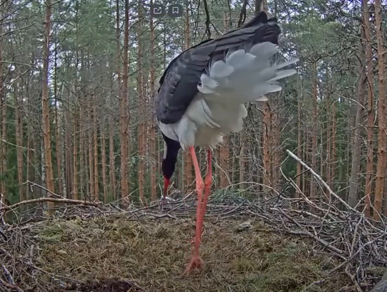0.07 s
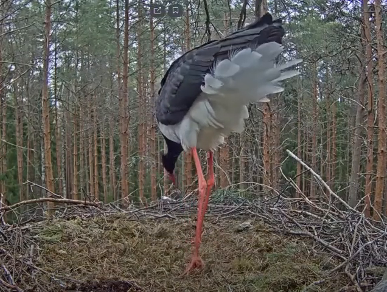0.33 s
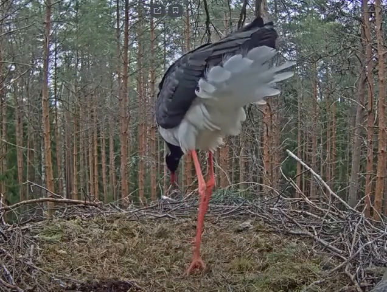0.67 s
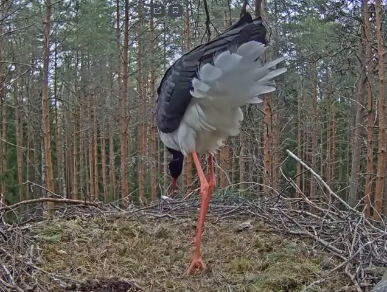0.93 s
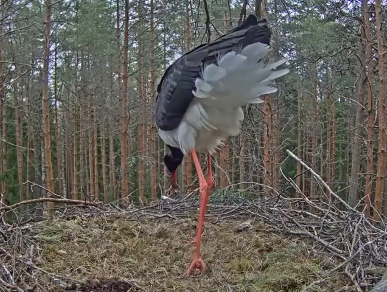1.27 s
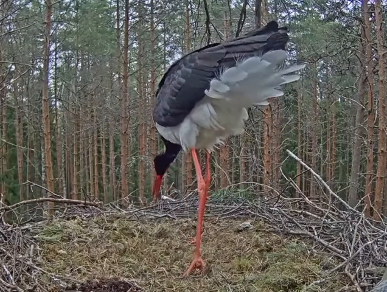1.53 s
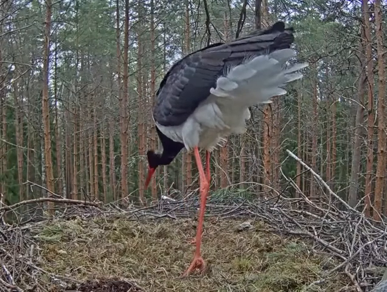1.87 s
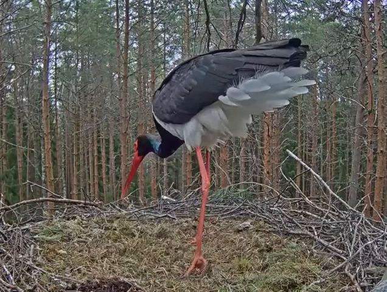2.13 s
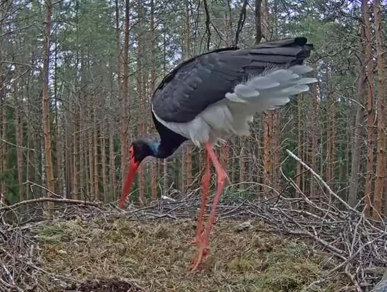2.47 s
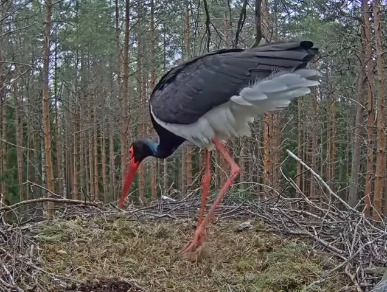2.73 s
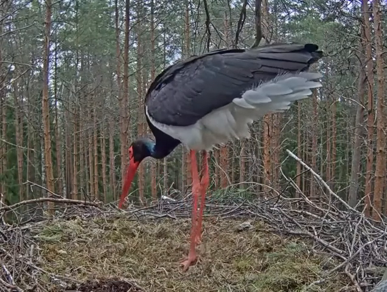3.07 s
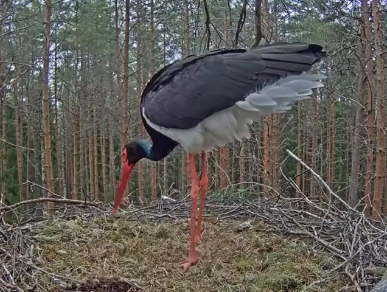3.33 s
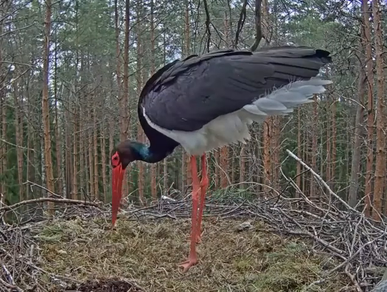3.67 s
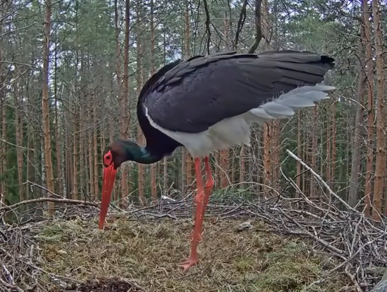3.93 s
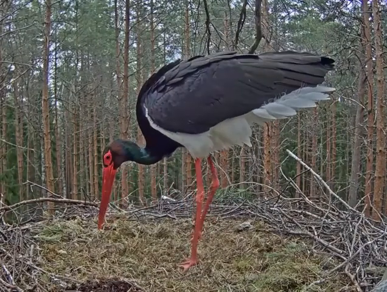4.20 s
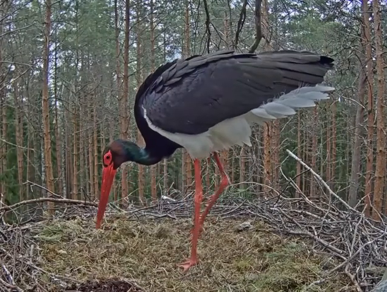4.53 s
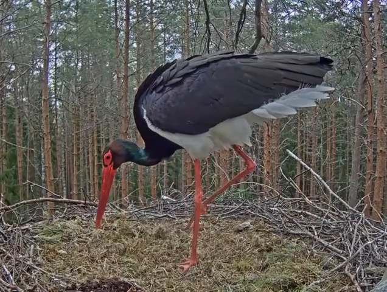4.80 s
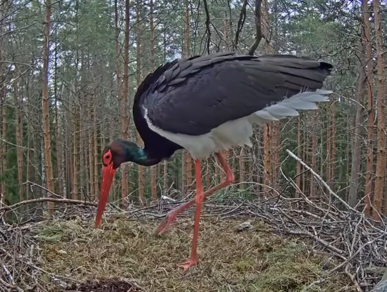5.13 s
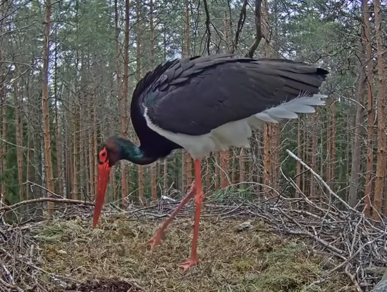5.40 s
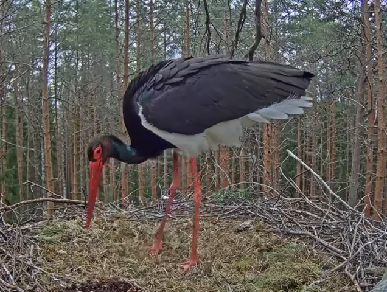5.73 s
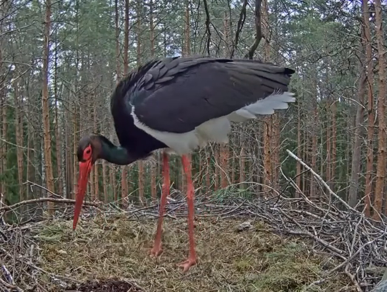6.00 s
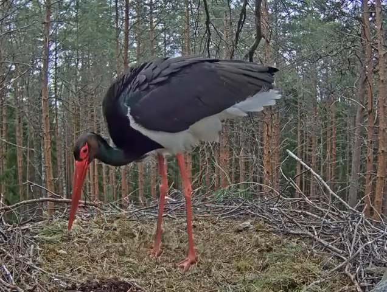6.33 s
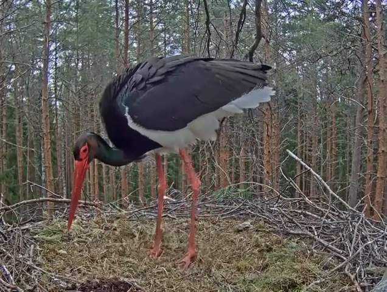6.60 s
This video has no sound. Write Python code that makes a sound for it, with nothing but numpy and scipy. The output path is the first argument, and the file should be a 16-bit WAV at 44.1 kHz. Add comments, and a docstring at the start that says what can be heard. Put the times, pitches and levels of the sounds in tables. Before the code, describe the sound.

A stork's brief squeal, two short hisses and soft peeps, with snapping twigs, then faint rustles in a breezy forest.

```python
"""A nest in a pine forest, where a black stork steps about over a steady rumble and a light breeze.
A bird on the nest squeals hoarsely, hisses twice and peeps softly in between: the syrinx is a
self-sustained oscillator, and turbulent air excites the resonances of the throat. Twigs snap and the
nest takes dull knocks, both as damped vibrations after an impulse; the lining rustles, feathers swish
and a bill smacks faintly. Near the end the breeze and a thin high hiss come up and stay up."""
import sys
import numpy as np
from scipy import signal
from scipy.fft import rfft, irfft, next_fast_len
from scipy.io import wavfile
from scipy.ndimage import uniform_filter1d, map_coordinates

SR = 44100
rng = np.random.default_rng(int(sys.argv[2]) if len(sys.argv) > 2 else 0)


def transcribe(signal):
    """Save signal, clipped to [-1, 1], as a 16-bit WAV file at the path in sys.argv[1]."""
    frames = np.atleast_2d(signal).T
    limited = np.clip(frames, -1, 1)
    pcm = np.round(limited * 32767).astype(np.int16)
    wavfile.write(sys.argv[1], SR, pcm)


N = 294147

RISE_S, RISE_LENGTH_S = 5.226, .18  # the breeze and the high hiss come up


def amp(db):
    """Decibels to amplitude ratio."""
    return 10 ** (np.asarray(db) / 20)


def unit(x):
    """Scale to rms 1."""
    return x / np.sqrt(np.mean(x ** 2) + 1e-20)


def along(points, hz):
    """Interpolate (Hz, value) points on a logarithmic frequency axis."""
    f, v = np.transpose(points)
    return np.interp(np.log(hz + 1), np.log(f + 1), v)


def clock():
    """The time of each sample in seconds."""
    return np.arange(N) / SR


def ramp(start, length):
    """A linear rise from 0 to 1."""
    return np.clip((clock() - start) / max(length, 1e-4), 0, 1)


def bump(centre, width):
    """A Gaussian swell of height 1; the width is its standard deviation."""
    return np.exp(-.5 * ((clock() - centre) / width) ** 2)


def gate(start, end, edge_s=.0012):
    """A window with sloping edges."""
    return np.clip(np.minimum(clock() - start, end - clock()) / edge_s + .5, 0, 1)


def wobble(rate):
    """A smooth random curve with rate knots a second."""
    return map_coordinates(rng.standard_normal(int(N * rate / SR) + 4), [np.arange(N) * rate / SR])


def filtered(x, response):
    """Zero-phase filtering: multiply the spectrum by a response of frequency."""
    size = next_fast_len(N + 8192)
    return irfft(rfft(x, size) * response(np.fft.rfftfreq(size, 1 / SR)), size)[..., :N]


def noise(response):
    """Filtered white noise of rms 1."""
    return unit(filtered(rng.standard_normal(N), response))


def spectrum_noise(points):
    """Noise of rms 1 whose spectrum follows (Hz, dB) points."""
    return noise(lambda hz: amp(along(points, hz)))


def resonances(modes, hz, cut_hz=860):
    """Gain of (Hz, half width in Hz, dB) peaks added in power; a small source radiates no bass."""
    power = sum(amp(db) ** 2 / (1 + .5 * ((hz - centre) / width) ** 2) ** 4
                for centre, width, db in modes)
    return np.sqrt(power / (1 + (cut_hz / (hz + 1)) ** 16))


def rumble(level_db=-42.5):
    """Distant rumble: nearly stationary noise with its power at low frequencies."""
    # Each row: frequency in Hz, relative spectral level in dB.
    spectrum = [(20, -15), (35, -9.5), (55, -6.5), (100, 0), (150, -0.5), (230, -6.5), (400, -8), (470, -6),
                (650, -12), (900, -16), (1500, -50)]
    return amp(level_db + .2 * wobble(4.75)) * spectrum_noise(spectrum)


def breeze(calm_db=-48.5, gust_db=3, rise_db=4.5, strong_db=-43):
    """Turbulence in the pines brightens with strength: needle noise grows faster than the low body."""
    # Each row of both: frequency in Hz, relative spectral level in dB.
    body_spectrum = [(200, -1.5), (500, -3), (1000, 0), (1380, -2), (1550, -9.5), (1800, -13.5),
                     (2000, -21), (3200, -27.5), (5000, -33)]
    needle_spectrum = [(900, -30), (1700, 3), (2600, 1), (4000, 2), (6000, -21), (12000, -42)]
    body_db = calm_db + gust_db * bump(1.63, .41) + rise_db * ramp(RISE_S, RISE_LENGTH_S)
    needle_db = -55 + 3.4 * np.minimum(body_db - strong_db, 0)
    body = amp(body_db + .53 * wobble(9)) * spectrum_noise(body_spectrum)
    return body + amp(needle_db) * spectrum_noise(needle_spectrum)


def high_hiss(calm_db=-53, rise_db=5.5):
    """The thin hiss of the forest: broadband noise with its power in the treble."""
    # Each row: frequency in Hz, relative spectral level in dB.
    spectrum = [(1500, -24), (2500, -11.5), (3900, -9.5), (4150, -2), (5500, 0.5), (8500, 1), (10000, -1),
                (13000, -5), (14300, -9.5), (15000, -47)]
    level_db = calm_db + rise_db * ramp(RISE_S, RISE_LENGTH_S) + .6 * wobble(4)
    return amp(level_db) * spectrum_noise(spectrum)


def trunk_echo(x, t60=.53, wet_db=-26):
    """Scattering from the nest rim and the trees adds a weak, exponentially decaying tail."""
    t = np.arange(SR // 2) / SR
    tail = rng.standard_normal(len(t)) * amp(-60 * t / t60)
    return x + amp(wet_db) * signal.fftconvolve(x, tail / np.linalg.norm(tail))[:N]


def feather_swishes():
    """Sliding friction of feathers gives smooth swells of bright noise as the stork steps."""
    # Each row: centre in seconds, level in dB, width in seconds.
    swishes = [(2.75, -58, .1), (3.72, -57, .12), (4.355, -49, .07), (6.4, -53, .13)]
    # Each row: frequency in Hz, relative spectral level in dB.
    spectrum = [(2500, -28), (3800, -14), (4700, -2), (9000, -1), (11000, -7), (15000, -25)]
    return sum(amp(db) * bump(s, width) for s, db, width in swishes) * spectrum_noise(spectrum)


def lining_rustle():
    """Dry moss and grass crackle at each shift of weight: noise under fast random modulation."""
    # Each row: centre in seconds, level in dB, width in seconds.
    shifts = [(0.502, -46, 0.069), (.9, -49, .06), (1.162, -44, 0.032), (1.314, -49.5, 0.036),
              (1.65, -53, 0.18)]
    bands = [(5650, 2300, 4.5), (8900, 2500, -1), (12500, 1700, -8)]
    clumps = amp(3 * wobble(70) + 4 * wobble(900))
    grains = clumps * noise(lambda hz: resonances(bands, hz))
    return sum(amp(db) * bump(s, width) for s, db, width in shifts) * unit(grains)


def cracks(events, damping, splinter):
    """An impulse and a dying spray of splinters drive a stick, a heavily damped oscillator."""
    out, t = np.zeros(N + SR), np.arange(SR // 16) / SR
    for start, db, hz, life in events:
        force = splinter * rng.standard_normal(len(t)) * amp(-40 * t / life)
        force[0] += 1
        stick = np.sqrt(t) * np.exp(-damping * hz * t) * np.sin(2 * np.pi * hz * t)
        crack = signal.fftconvolve(force, stick)[:len(t)]
        out[round(start * SR):][:len(t)] += amp(db) * crack / np.abs(crack).max()
    return out[:N]


def twig_snaps():
    """Brittle fracture rings the twigs briefly at high frequencies."""
    # Each row: start in seconds, peak in dB, frequency in Hz, 40 dB decay of the splinters in seconds.
    snaps = [(.0998, -19, 5670, 0.0051), (.11, -21, 7000, 0.0057), (.189, -21.5, 8400, 0.011),
             (.477, -25.5, 6500, .0056), (.6884, -24.5, 8300, .018), (.7955, -4.5, 4800, 0.0031),
             (.8044, -13.5, 5770, .0021), (.8685, -24.5, 7460, 0.051), (.953, -29, 7500, .021),
             (1.2015, -19.5, 11100, 0.0083), (1.2022, -11, 5250, 0.0093), (1.21, -20.5, 4960, .03),
             (1.292, -25.5, 8650, .018), (1.3175, -22.5, 8800, 0.015), (1.4465, -26.5, 5470, 0.0075),
             (5.276, -25.5, 5250, 0.0033)]
    return cracks(snaps, damping=1, splinter=.38)


def nest_knocks():
    """Impacts on the nest sound dull: low resonances, strong damping, little splintering."""
    # Each row: start in seconds, peak in dB, frequency in Hz, 40 dB decay of the splinters in seconds.
    knocks = [(.7956, -8, 1600, 0.0048), (.7975, -31, 1100, .012), (5.2754, -27, 600, .005),
              (5.2759, -23, 1260, .002), (5.278, -28, 1090, .008)]
    return cracks(knocks, damping=1.7, splinter=.091)


def bill_smacks(gap_s=.0394, fade_db_per_s=31, start_hz=1050, rise_hz=3000, fuzz=.33, gain_db=-8):
    """Wet smacks of a bill in fading bouts: upward chirps, broadened by phase noise."""
    # Each row: start in seconds, length in seconds, relative level of the first smack in dB.
    bouts = [(1.072, .02, -38), (1.908, .14, -35.5), (4.84, .3, -35.5), (5.744, .22, -27)]
    beats = [(s + lag, db - fade_db_per_s * lag)
             for s, span, db in bouts for lag in np.arange(0, span, gap_s)]
    flicks = [(s, db, 3) for s, db in beats]
    flicks += [(s + .01, db - 8.5, 6.5) for s, db in beats]  # a weaker, erratic flick follows each
    out = np.zeros(N + SR)
    for s, db, scatter_db in flicks:
        stretch, sweep = np.exp(rng.uniform(-.5, .5, 2))
        level = amp(gain_db + db + scatter_db * rng.uniform(-1, 1))
        s += rng.uniform(-.006, .006)
        count = int(.009 * stretch * SR)
        progress = np.linspace(0, 1, count)
        pitch = start_hz + rise_hz * sweep * progress ** 2
        phase = np.cumsum(2 * np.pi * pitch / SR + fuzz * rng.standard_normal(count))
        out[round(s * SR) - count // 4:][:count] += level * np.sin(np.pi * progress) * np.sin(phase)
    return out[:N]


def syrinx(pitch, overtones_db, jitter, jitter_rate):
    """Self-sustained oscillation at rms 1: an unsteady fundamental with weak harmonics."""
    phase = 2 * np.pi * np.cumsum(pitch * (1 + jitter * wobble(jitter_rate))) / SR
    overtones = sum(amp(db) * np.sin(k * phase) for k, db in enumerate(overtones_db, 2))
    return unit(np.sin(phase) + overtones)


def peeps(air_db=-18, fade_db=19.5, arch=1.5, bend=1.55):
    """Soft, airy whines: one peak of effort modulates both the amplitude and the frequency."""
    # Each row: start, peak and end in seconds, pitch in Hz and level in dB at the peak,
    # rise before it in Hz, fall after it in Hz (negative rises on), swell up to it in dB.
    calls = [(0.48, .5, 0.6, 1052, -23.5, 30.35, 73, 9), (0.605, 0.629, 0.7, 1017, -40.5, 40.1, -54, 5),
             (0.8, 0.885, 0.923, 1067, -28.5, 85, -22, 4), (1.198, 1.263, 1.274, 1035, -38, 120.2, 25, 6),
             (1.369, 1.44, 1.472, 1090, -24, 180, -100, 19.5),
             (1.451, 1.467, 1.525, 1325, -26, 148.7, 560, 18), (1.799, 1.824, 1.847, 988, -36, 149, 130, 3)]
    formants = [(1120, 400, .5), (2170, 450, -3.5), (2780, 300, -10), (5000, 2500, -22)]
    air = noise(lambda hz: resonances(formants, hz))
    flutter = amp(1.1 * wobble(170))
    out = np.zeros(N)
    for start, peak, end, hz, db, rise_hz, fall_hz, swell_db in calls:
        before, after = 1 - ramp(start, peak - start), ramp(peak, end - peak)
        pitch = hz - rise_hz * before ** bend - fall_hz * after ** bend
        level = amp(db - swell_db * before ** arch - fade_db * after ** arch)
        voice = syrinx(pitch * (1 + .009 * wobble(55)), [-18, -34], jitter=.016, jitter_rate=600)
        out += gate(start, end) * level * (voice + amp(air_db) * air)
    return flutter * out


def hiss_envelopes(start, release, throat_db, friction_db, swell_db):
    """Airflow sets the level: it builds and is cut off, and the bright friction peaks just before."""
    attack_s, lead_s, push_db_per_s, cut_db_per_s = .018, .037, 32.5, 680
    since_release, peak = clock() - release, release - lead_s
    air = ramp(start, attack_s) * amp(-cut_db_per_s * np.maximum(since_release, 0))
    push_db = push_db_per_s * np.minimum(since_release, 0)
    arch_db = -swell_db * (1 - ramp(start, peak - start)) ** 2.26 - 7 * ramp(peak, lead_s) ** 2
    return air * amp(throat_db + push_db), air ** 1.54 * amp(friction_db + arch_db)


def throat_hisses(split_hz=4200, swell_s=.056, swell_db=11, drift_share=.022, gain_db=-.7):
    """Source and filter: turbulent air excites formants that swell in turn as the bill moves."""
    # Each row: start and release in seconds, then relative throat level at the release,
    # relative peak of the friction and its swell, all in dB.
    breaths = [(.24, 0.422, -19, -19, 22), (1.541, 1.732, -20.5, -20.5, 18.5)]
    # One list a hiss. Each row: centre and half width in Hz, gain in dB, strongest moment in seconds.
    formants = [
        [(1096, 280, -3.5, 0.33), (1416, 87, -1, 0.35), (1894, 230, -0.5, 0.33), (2670, 236, 0.5, 0.33),
         (3490, 88, 2.5, 0.35), (3750, 220, -3, 0.34), (4730, 530, -12.5, 0.34), (5370, 180, -9, 0.37),
         (5890, 200, -2.5, 0.39), (7030, 350, -8, 0.36), (7900, 140, -1.5, 0.45), (8970, 630, -7.5, 0.47),
         (10200, 170, -9.5, 0.37), (11500, 230, -17, 0.3), (11880, 440, -8.5, 0.47), (13550, 480, -15.5, 0.43)],
        [(1085, 230, 0, 1.6), (1460, 74, 1, 1.72), (2020, 640, -3.5, 1.636), (2625, 220, 1.5, 1.634),
         (3480, 120, -0.5, 1.74), (3700, 320, -1.5, 1.608), (4770, 340, -1, 1.673), (5880, 250, -5, 1.644),
         (7050, 480, -4.5, 1.62), (8270, 730, -11, 1.67), (9930, 1150, -6, 1.78), (11540, 350, -11, 1.59),
         (13100, 620, -20, 1.67)],
    ]
    out = np.zeros(N)
    for (start, release, *levels), modes in zip(breaths, formants):
        hz, t, source = signal.stft(rng.standard_normal(N), SR, nperseg=512)
        active = (t > start - .05) & (t < release + .1)
        hz, t = hz[:, None], t[active]
        moving_modes = []
        for centre, width, db, strongest in modes:
            drift = unit(uniform_filter1d(rng.standard_normal(len(active)), size=7))[active]
            swell = swell_db * np.exp(-.5 * ((t - strongest) / swell_s) ** 2)
            moving_modes.append((centre * (1 + drift_share * drift), width, db + swell))
        shape = resonances(moving_modes, hz)
        dark = 1 / (1 + (hz / split_hz) ** 16)  # the throat's share of the power; the rest is friction
        flutter = unit(amp(.57 * wobble(300)))
        for share, envelope in zip((dark, 1 - dark), hiss_envelopes(start, release, *levels)):
            gain = np.zeros(source.shape)
            gain[:, active] = shape * np.sqrt(share / np.mean(shape ** 2 * share, axis=0))
            out += flutter * envelope * signal.istft(source * gain, nperseg=512)[1][:N]
    return amp(gain_db) * out


def squeal(upper_hz=1745, lower_hz=1493, flips_per_s=46, drop_hz=480):
    """A bistable voice: the syrinx flips between two pitches over rasping air, then slides down."""
    # Each row: time in seconds, relative level of the voice in dB.
    contour = [(0.0, -29.5), (0.016, -24.5), (0.036, -29), (0.046, -26), (0.11, -22), (0.205, -29.5)]
    # Each row: centre of a throat resonance in Hz, half width in Hz, gain in dB.
    formants = [(1140, 120, 2.5), (1470, 140, 4), (1870, 410, -3.5), (2615, 150, 5), (2870, 100, -3),
                (3520, 230, -5.5), (4470, 360, -14), (5440, 340, -11), (6150, 440, -13), (8270, 430, -13.5),
                (10500, 2500, -25.5)]
    settle_s, collapse_s, slide_s = .094, .203, .035
    t = clock()
    level = amp(np.interp(t, *np.transpose(contour)) - 1.1)
    lean = np.where(t < settle_s, -.48, 1.9)  # first towards the lower pitch, then the upper
    lean += 1.5 * np.cos(2 * np.pi * flips_per_s * (t - settle_s))
    flip = np.pi / 4 * (1 + np.tanh(lean + .89 * wobble(131)))  # 0 = lower, a quarter turn = upper
    upper = syrinx(upper_hz * (1 + .01 * wobble(40)), [-13, -30], jitter=.011, jitter_rate=500)
    lower = syrinx(lower_hz, [-24], jitter=.02, jitter_rate=600)
    air = unit(noise(lambda hz: resonances(formants, hz)) * amp(2.4 * wobble(141)))
    leak = amp(2.8 * np.cos(flip) - 1.5)  # more air escapes on the lower pitch
    rasp = amp(-34 + 36 * np.minimum(t, collapse_s))  # grows as the voice tires
    shake = amp(1.8 * wobble(250))
    held = level * shake * (np.sin(flip) * upper + np.cos(flip) * lower) + rasp * leak * air
    slide = ramp(collapse_s, slide_s)
    fall_hz = lower_hz - drop_hz * slide ** 1.63
    fall = shake * syrinx(fall_hz, [-17, -22], jitter=.045, jitter_rate=710) + amp(-5) * air
    fall_level = amp(-25 - 14 * (2 * slide - .85) ** 2)
    return gate(0, collapse_s) * held + gate(collapse_s, collapse_s + slide_s) * fall_level * fall


def scene():
    """Superposition at one point: both channels carry the same sum of bird, nest and forest."""
    bird = squeal() + throat_hisses() + peeps() + bill_smacks()
    nest = twig_snaps() + nest_knocks() + lining_rustle() + feather_swishes()
    return np.tile(trunk_echo(bird + nest) + rumble() + breeze() + high_hiss(), (2, 1))


def record(dry, top_hz=15200, offset=.0171):
    """Linear filtering colours each channel slightly and limits the band; a constant offset is added."""
    # Each row: frequency in Hz, level of the left channel over the right in dB.
    balance = [(40, -3.5), (130, -1.96), (290, 0), (600, 0.3), (800, 1.8), (950, -0.5), (1300, 1),
               (2000, -0.5), (3000, 0.7), (3800, 1.5), (5700, 0), (7500, 0), (8300, -3.5), (11500, -4)]
    coloured = filtered(dry, lambda hz: amp(np.outer([.5, -.5], along(balance, hz))))
    return filtered(coloured, lambda hz: hz < top_hz) + offset


dry = scene()
out = record(dry)
transcribe(out)
```